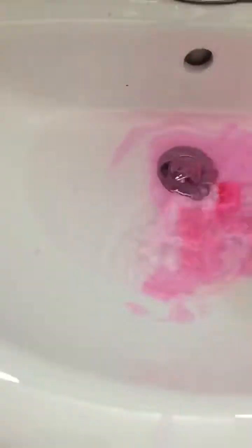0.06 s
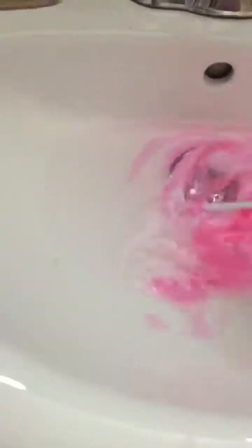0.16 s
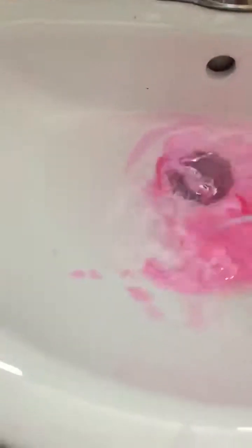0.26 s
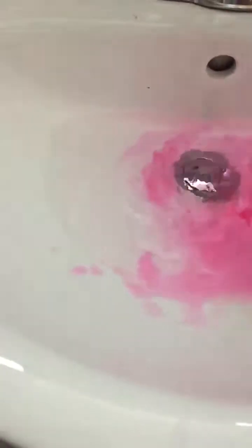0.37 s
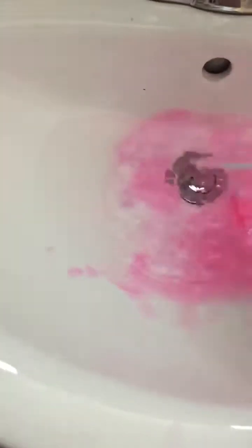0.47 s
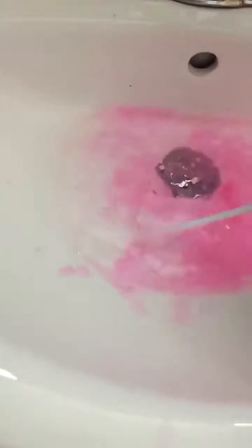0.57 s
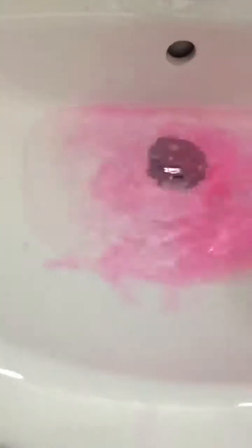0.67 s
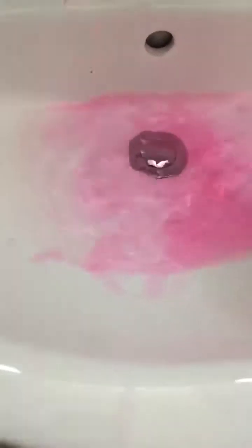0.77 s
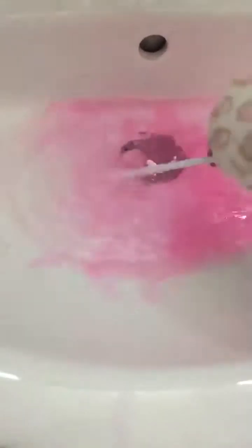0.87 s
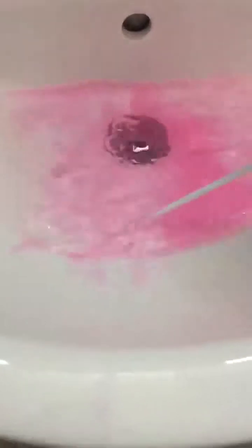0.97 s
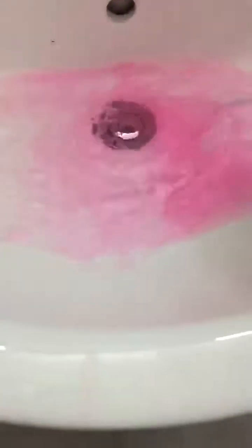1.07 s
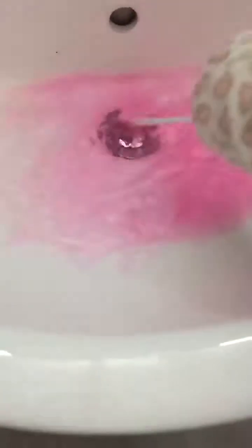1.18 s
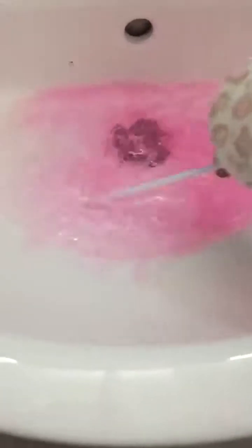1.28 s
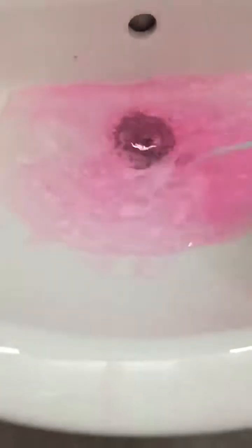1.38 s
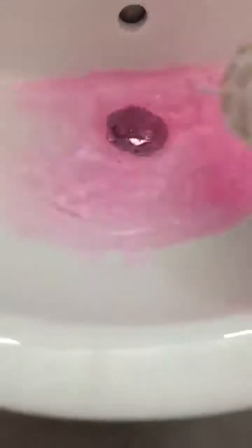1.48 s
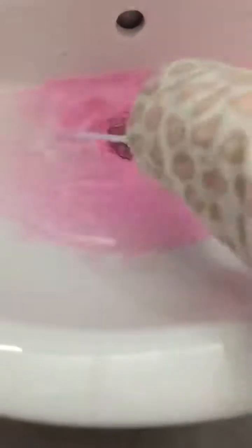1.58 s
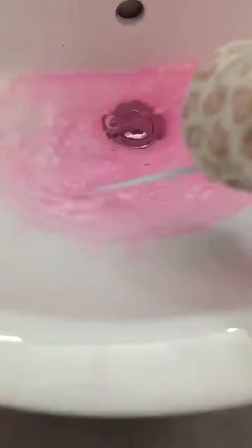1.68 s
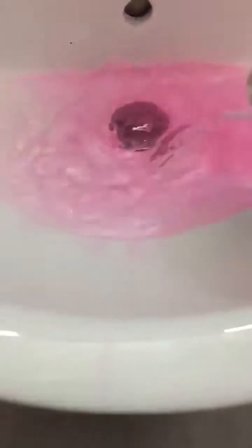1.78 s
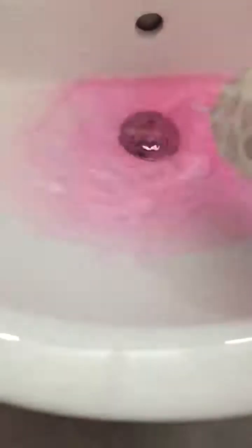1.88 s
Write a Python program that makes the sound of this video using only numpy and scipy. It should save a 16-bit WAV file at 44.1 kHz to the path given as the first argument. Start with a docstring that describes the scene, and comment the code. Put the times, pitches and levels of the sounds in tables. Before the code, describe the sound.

Shallow water splashes unevenly in a ceramic sink, close by, with bubbly plops and light fizzing spray. Sharp clicks hit the basin, the loudest at about 0.3 seconds, others near 0.6, 1.0 and 1.3. Around 0.9 seconds a brief gurgle sinks in pitch down the plughole. The splashes continue, growing softer after 1.6 seconds. A faint trickle runs underneath, with the short echo of a small tiled bathroom.

```python
"""A small tiled bathroom: shallow water splashes about a ceramic sink and gurgles at the plughole.
Trapped air is a spring loaded by the water's mass, so each bubble rings, higher the smaller it is.
Closing air pockets give gliding tones; splashes free small bubbles, throw spray and leave fizzing foam.
Sharp clicks excite the basin's modes and heavier splashes thud. Close by, the bowl reflects the sound;
the room answers with a short reverberation, over a faint trickle and a quiet background."""
import sys
import numpy as np
from scipy import signal
from scipy.fft import rfft, irfft
from scipy.io import wavfile

SR = 44100
rng = np.random.default_rng(int(sys.argv[2]) if len(sys.argv) > 2 else 0)


def digitize_waveform(pressure):
    """Quantize a signal to 16-bit integers and store it at the path in sys.argv[1].

    Rows of a 2-D input are taken as channels; values are limited to [-1, 1].
    """
    field = np.atleast_2d(pressure).T
    bounded = np.clip(field, -1, 1)
    quanta = np.round(bounded * 32767).astype(np.int16)
    wavfile.write(sys.argv[1], SR, quanta)


N = 85995
TOP_HZ = 16100


def undb(db):
    """Decibels to amplitude ratio."""
    return 10 ** (np.asarray(db) / 20)


def unit(x):
    """Normalisation to rms 1."""
    return x / np.sqrt(np.mean(x ** 2) + 1e-18)


def fade(t, t60):
    """Exponential damping: 60 dB down after t60 seconds."""
    return np.exp(-np.log(1000) * t / t60)


def add(out, start, x):
    """Superposition: x joins out at a time in seconds."""
    i = int(np.clip(start * SR, 0, len(out) - 1))
    out[i:i + len(x)] += x[:len(out) - i]


def colour(x, points):
    """Spectral shaping by a curve through (frequency_hz, gain_db) points."""
    hz, db = np.array(points, float).T
    f = np.maximum(np.fft.rfftfreq(len(x), 1 / SR), 1)
    return irfft(rfft(x) * undb(np.interp(np.log(f), np.log(hz), db)), len(x))


def band(x, hz, kind):
    """Butterworth filtering."""
    return signal.sosfilt(signal.butter(2, hz, kind, fs=SR, output="sos"), x)


def swell(t, attack, decay):
    """Gaussian rise to a peak at t = 0, then exponential decay."""
    return np.exp(-np.where(t < 0, (t / attack) ** 2, t / decay))


def jitter(samples, cutoff_hz):
    """Random modulation: two independent low-passed noises."""
    return unit(band(rng.standard_normal((2, SR // 4)), cutoff_hz, "lowpass"))[:, :samples]


def bubble(hz, t60, rise, max_glide_oct=0.74):
    """A damped oscillator: its pitch glides at `rise` octaves a second, levelling off at the surface."""
    t = np.arange(int(t60 * SR) + 2) / SR
    glide_oct = max_glide_oct * np.tanh(rise * t / max_glide_oct)
    pitch = np.minimum(hz * 2 ** glide_oct, SR / 2)
    onset = 1 - np.exp(-(t * hz) ** 2)
    return np.sin(2 * np.pi * np.cumsum(pitch) / SR) * fade(t, t60) * onset


def cloud(per_s, hz, spread_oct, cycles, scatter_db, length_s):
    """Incoherent sum of random bubbles, each ringing for about `cycles` periods; rms 1."""
    out = np.zeros(int(length_s * SR))
    for k, (when, a, b, size) in enumerate(rng.random((int(per_s * length_s), 4))):
        pitch = min(hz * 2 ** (spread_oct * np.sqrt(6) * (a + b - 1)), TOP_HZ)
        t60 = cycles / pitch
        gain = undb(scatter_db * min(-np.log(1 - size), 4))
        add(out, (k + 2 * when) / per_s, gain * bubble(pitch, t60, rise=0.56 / t60))
    return unit(out)


# Spectrum of the background: frequency_hz, relative_density_db
BACKGROUND_SPECTRUM = [(20, -34), (48, 0), (130, 6.5), (220, -2), (500, -0.5), (2000, -4), (6000, -9.5),
                       (16000, -20.5)]


def background(level_db=-63):
    """Stationary noise, densest in the bass."""
    return undb(level_db) * unit(colour(rng.standard_normal(N), BACKGROUND_SPECTRUM))


def trickle(level_db=-57.5):
    """Many faint bubble resonances overlap into a steady trickle."""
    stream = cloud(per_s=600, hz=2029, spread_oct=0.554, cycles=66, scatter_db=2.5, length_s=2)
    return undb(level_db) * stream[:N]


# Air pockets that swell and close: start_s, length_s, start_pitch_hz, end_pitch_hz, level_db
AIR_POCKETS = [(0, 0.15, 2460, 1993, -48.5), (0.025, 0.075, 650, 1170, -44.5),
               (0.336, 0.052, 630, 664, -46), (0.372, 0.038, 903, 1075, -31.5),
               (0.411, 0.0232, 1468, 3010, -27.5), (0.766, 0.054, 1770, 2106, -39),
               (0.861, .04, 598, 830, -43.5), (1.077, 0.039, 866, 2450, -46),
               (1.226, 0.0515, 690, 1265, -46.5), (1.692, 0.032, 880, 1024, -43.5),
               (1.73, 0.081, 507, 708, -49)]


def air_pockets(wobble_depth=0.0492, flutter_db=4.5):
    """Cavity resonance: a closing air pocket sounds an unsteady tone that usually rises."""
    out = np.zeros(N)
    for start, length, from_hz, to_hz, db in AIR_POCKETS:
        progress = np.linspace(0, 1, int(length * SR))
        wobble, flutter = jitter(len(progress), cutoff_hz=129)
        pitch = from_hz * (to_hz / from_hz) ** (progress ** 1.274) * (1 + wobble_depth * wobble)
        envelope = undb(db + flutter_db * flutter) * np.sin(np.pi * progress ** 0.67)
        add(out, start, envelope * np.sin(2 * np.pi * np.cumsum(pitch) / SR))
    return out


# Clicks on the basin: start_s, level_db, treble_tilt_db_per_octave
BASIN_CLICKS = [(0.0378, -26.5, -2.5), (0.2704, 1, 1.5), (0.4008, -28, 0), (0.4524, -25, -1.5),
                (0.4725, -31, 7), (0.483, -37, 13), (0.6106, -8, -1.5), (0.6504, -20.5, -1),
                (0.666, -24, -3), (.739, -32, 20), (0.9744, -8.5, -0.5), (1.003, -17.5, -5.5),
                (1.064, -28, 12.5), (1.2047, -24.5, 10), (1.3183, -6.5, -1.5), (1.376, -15, 1.5),
                (1.4417, -23.5, -6), (1.93, -31.5, 1)]
# Modes of the basin and its hardware: pitch_hz, level_db, t60_s
BASIN_MODES = [(1321, -20, 0.034), (3360, -26.5, 0.038), (4550, -27.5, 0.087), (7010, -15.5, 0.0089),
               (9187, -12.5, 0.01), (13100, -16, 0.0052)]


def basin_clicks(crack_db=-4, detune_ratio=0.026, low_hz=803, high_hz=13400):
    """Impact excitation: a short crack, then clusters of close modes ring, mixed anew by every tap."""
    out, t = np.zeros(N), np.arange(SR // 8) / SR
    for start, db, tilt in BASIN_CLICKS:
        tap = undb(crack_db) * rng.standard_normal(len(t)) * fade(t, t60=0.0072)
        for hz, mode_db, t60 in BASIN_MODES:
            detune, phase = rng.uniform(-0.91, 1, size=(2, 8, 1))
            pitches = hz * (1 + detune_ratio * detune)
            cluster = np.sin(2 * np.pi * pitches * t + np.pi * phase).sum(axis=0)
            tap += undb(mode_db) * unit(cluster) * fade(t, t60)
        tilted = colour(np.pad(tap, (0, len(t))), [(1000, -3 * tilt), (16000, tilt)])
        add(out, start, undb(db) * tilted[:len(t)])
    return band(band(out, [low_hz, high_hz], "bandpass"), low_hz, "highpass")


# Splashes: peak_s, decay_s, bubble_level_db, spray_level_db, middle_bubble_pitch_hz
WATER_SPLASHES = [(0.047, 0.019, -49, -47, 2420), (.226, 0.017, -35.5, -40, 1445),
                  (0.413, 0.015, -35.5, -46.5, 1750), (.468, 0.016, -37.5, -50, 1910),
                  (0.602, 0.031, -38, -39.5, 1765), (0.646, 0.037, -37, -41.5, 1810),
                  (.952, 0.015, -33, -33.5, 1530), (1.004, 0.015, -31, -39.5, 2090),
                  (1.101, 0.058, -46.5, -80, 2010), (1.292, 0.073, -34.5, -43, 1774),
                  (1.379, 0.003, -24.5, -41, 2560), (1.444, 0.059, -41, -73, 2050),
                  (1.603, 0.057, -38, -45.5, 1866), (1.83, 0.027, -40.5, -48, 2550)]


def splashes(attack_s=0.012, foam_db=-20.5, foam_decay_s=0.75, clump_db=6, fizz_db=-13):
    """Air entrainment: each splash frees small bubbles, throws spray and leaves foam bursting in clumps."""
    t, bubbles = np.arange(N) / SR, np.zeros(N)
    spray_power, foam_power, lead_s = 0, 0, 2 * attack_s
    for peak, decay, db, spray_db, hz in WATER_SPLASHES:
        small = cloud(per_s=900, hz=hz, spread_oct=0.554, cycles=19.6, scatter_db=2.5, length_s=0.17)
        envelope = swell(t[:len(small)] - lead_s, attack_s, decay)
        add(bubbles, peak - lead_s, undb(db) * envelope * small)
        spray_power += (undb(spray_db) * swell(t - peak, attack_s, decay)) ** 2
        foam_power += (undb(spray_db + foam_db) * swell(t - peak, attack_s, foam_decay_s)) ** 2
    spray = cloud(per_s=1300, hz=6820, spread_oct=0.467, cycles=35, scatter_db=4, length_s=2)[:N]
    tiny_drops = rng.standard_normal(N) * rng.exponential(size=N)
    fizz = unit(band(tiny_drops, 9700, "highpass"))
    drift = unit(band(rng.standard_normal(N), 24.7, "lowpass"))
    clumps = unit(undb(clump_db * drift))
    spray_gain = np.sqrt(spray_power + foam_power * clumps ** 2)  # incoherent sources add in power
    return bubbles + spray_gain * (spray + undb(fizz_db) * fizz)


# Single loud bubbles: start_s, pitch_hz, level_db, t60_s, rise_octaves_per_s
RINGING_BUBBLES = [ (0.2096, 1040, -14, 0.085, 19), (0.228, 950, -15.5, 0.011, 57),
                   (0.2352, 1300, -5, 0.0049, 29), (0.3701, 1580, -22, 0.014, -13),
                   (.372, 671.6, -25, 0.09, -1), (0.4015, 2275, -11, 0.017, -62.5),
                   (0.4715, 1450, -12.5, 0.0047, -20), (0.515, 6060, -19, 0.012, 25),
                   (0.583, 1270, -24, 0.025, 17), (0.6112, 2376, -4.5, 0.01, 19),
                   (0.636, 1057, -12, 0.015, -6), (.642, 2260, -12, 0.0075, 27),
                   (0.677, 1870, -24, 0.023, 13), (0.8995, 1090, -16.5, 0.033, 19),
                   (.9005, 671, -25, 0.1, 13.5), (0.913, 1073, -18, 0.039, 63),
                   (0.973, 525.7, -16, 0.066, 3.5), (1.005, 750, -22, 0.06, -24),
                   (1.260, 1080, -15, 0.04, 21), (1.2709, 1230, -15, 0.015, 18),
                   (1.287, 797, -18.5, 0.019, 16), (1.357, 2293, -8, 0.024, 128),
                   (1.3635, 6840, -15.5, 0.0064, 12), (1.4261, 2100, -13.5, 0.011, 29),
                   (1.4424, 1710, -12.5, 0.01, 32), (1.453, 700, -33.5, 0.12, 2),
                   (1.592, 1134, -21, 0.042, -7), (1.607, 2890, -16, 0.0079, 75),
                   (1.6151, 5830, -25, 0.009, 53), (1.112, 5910, -24, 0.0074, 20),
                   (1.769, 3740, -28, 0.027, 33), (1.808, 1675, -22.5, 0.009, -14),
                   (1.81, 939, -30, 0.11, 7), (1.9317, 4580, -25.5, 0.015, 11)]


def ringing_bubbles(wobble_depth=0.034, flutter_db=3, snap_db=-24.5):
    """Minnaert resonance: a bubble breaks free with a snap and rings, wavering as its shape wobbles."""
    out = np.zeros(N)
    for start, hz, db, t60, rise in RINGING_BUBBLES:
        tone = bubble(hz, t60, rise)
        samples = np.arange(len(tone))
        wobble, flutter = jitter(len(tone), cutoff_hz=150)
        tone = np.interp(np.cumsum(1 + wobble_depth * wobble), samples, tone)
        snap = rng.standard_normal(len(tone)) * fade(samples / SR, t60=0.0072)
        add(out, start, undb(db + flutter_db * flutter) * tone + undb(db + snap_db) * snap)
    return out


def gurgle(start_s=0.926, glide_s=0.073, from_hz=873, to_hz=562, per_s=300, decay_s=0.021, level_db=-29):
    """Large bubbles resonate low: a crowd goes down the plughole, sinks in pitch, then dies away."""
    out = np.zeros(N)
    spread_oct, scatter_db = 0.4, 5.7
    for k, (when, detune, size) in enumerate(rng.uniform(-1.01, 1, (72, 3))):
        age = (k + 0.5 * when) / per_s
        middle_hz = from_hz * (to_hz / from_hz) ** min(age / glide_s, 1)
        tone = bubble(middle_hz * 2 ** (spread_oct * detune), t60=0.024, rise=5.8)
        gain = undb(scatter_db * size) * np.exp(-max(age - glide_s, 0) / decay_s)
        add(out, start_s + age, gain * tone)
    return unit(out) * np.sqrt(glide_s * SR / N) * undb(level_db)  # energy of level_db held for glide_s


# Thuds of moving water in the bowl: peak_s, level_db
WATER_THUDS = [(0.972, -49), (1.318, -53.5)]


def thuds(band_hz=(111, 377)):
    """Bulk motion: the heavier splashes shake the water, giving swells of low noise."""
    t = np.arange(N) / SR
    rumble = unit(band(rng.standard_normal(N), band_hz, "bandpass"))
    return rumble * sum(undb(db) * swell(t - peak, attack=0.025, decay=0.027) for peak, db in WATER_THUDS)


# Colour of the room's reverberation: frequency_hz, gain_db
REVERB_COLOUR = [(100, 31), (400, 0), (800, 2), (2000, 2), (4000, 3), (8000, -6)]


def bathroom(x, bowl_db=-13, tail_db=-12.5, build_up_s=0.0046):
    """Reverberation by convolution: dense early reflections in the bowl, then the tiled room's tail."""
    t = np.arange(SR // 2) / SR
    room_noise, bowl_noise = rng.standard_normal((2, len(t)))
    lingering = colour(room_noise, [(1500, -13.5), (9000, -16)])
    tail = lingering * fade(t, t60=0.4) + (room_noise - lingering) * fade(t, t60=0.21)
    tail *= 1 - np.exp(-(t / build_up_s) ** 2)
    tail = colour(tail / np.linalg.norm(tail), REVERB_COLOUR)
    bowl = bowl_noise * fade(t, t60=0.052) * (t > 0.001)
    response = undb(tail_db) * tail + undb(bowl_db) * bowl / np.linalg.norm(bowl)
    return x + signal.fftconvolve(x, response)[:N]


def scene():
    """Superposition in one channel: the water in its room, the thuds and the background."""
    floor = background()
    water = trickle() + air_pockets() + basin_clicks() + splashes() + ringing_bubbles() + gurgle()
    radiated = band(water, 342, "highpass")  # the water's sounds carry little deep bass
    return (floor + thuds() + bathroom(radiated))[None]


def record(dry):
    """Band limiting: a steep elliptic low-pass cuts the highest treble."""
    return signal.sosfilt(signal.ellip(8, 0.2, 70, TOP_HZ, fs=SR, output="sos"), dry)


dry = scene()
out = record(dry)
digitize_waveform(out)
```